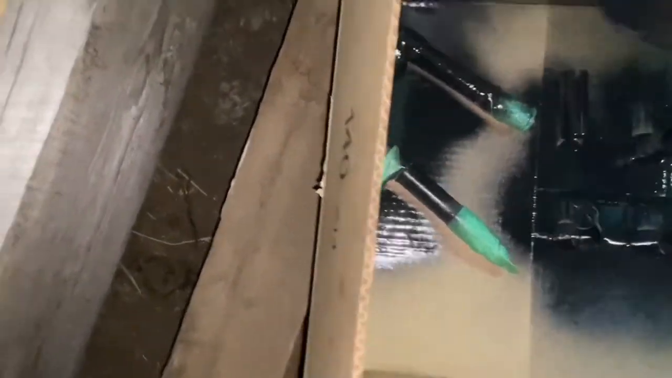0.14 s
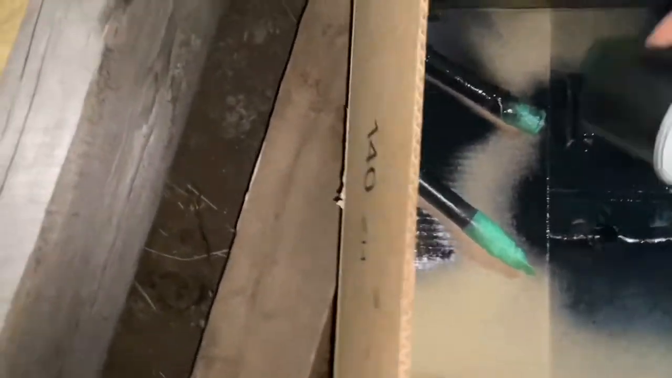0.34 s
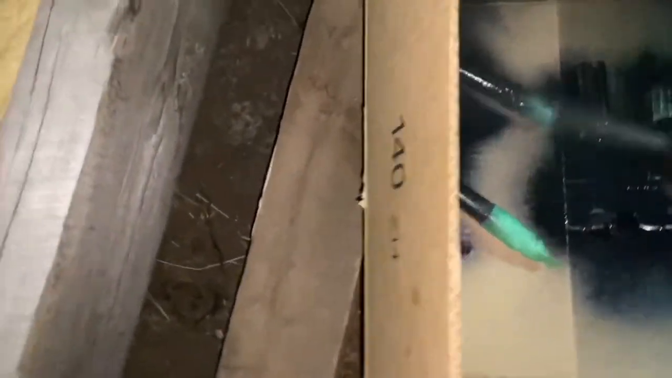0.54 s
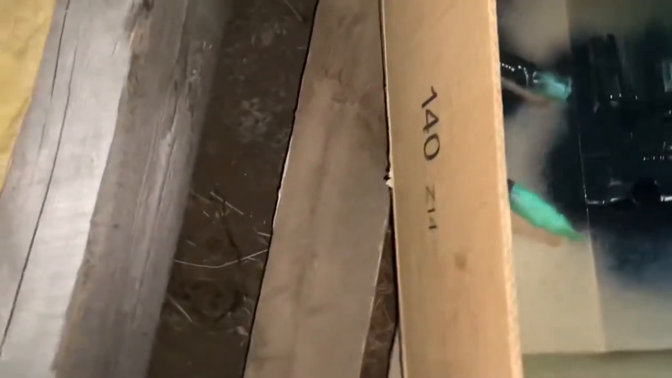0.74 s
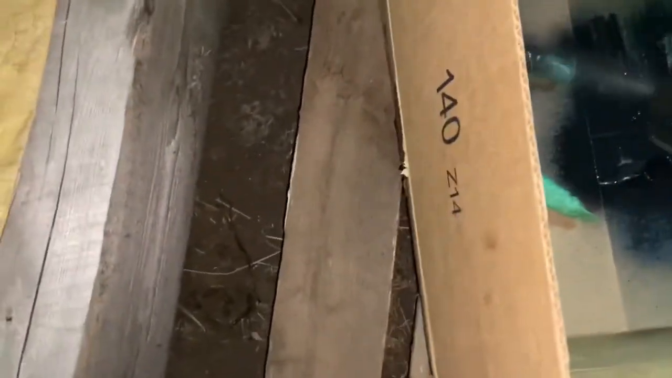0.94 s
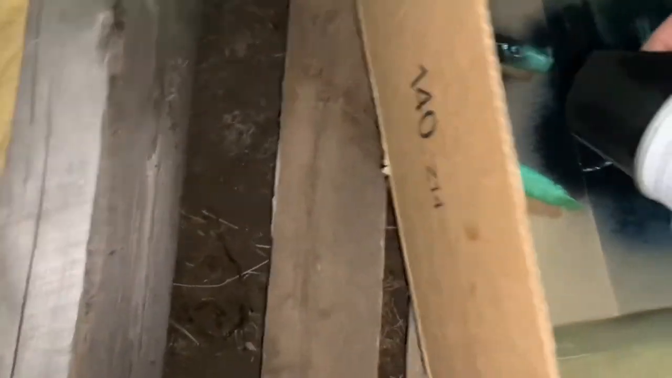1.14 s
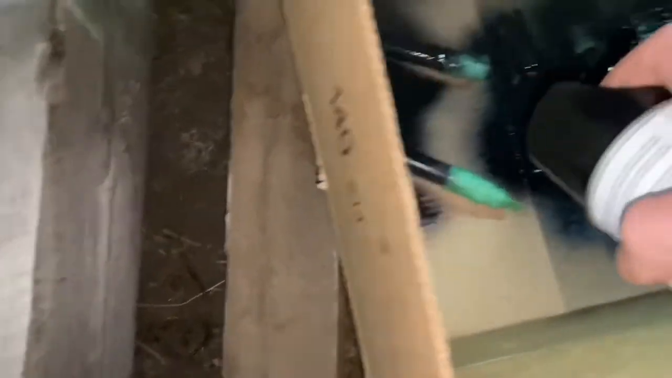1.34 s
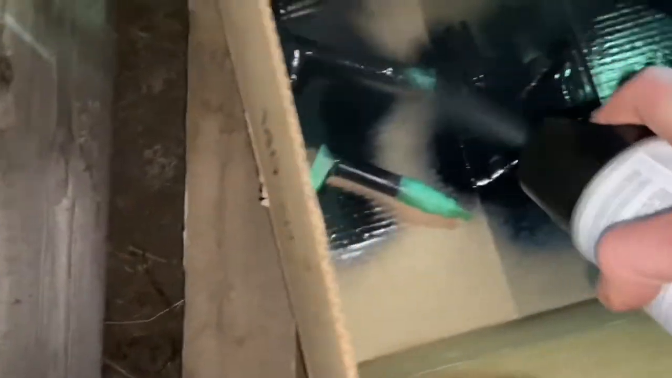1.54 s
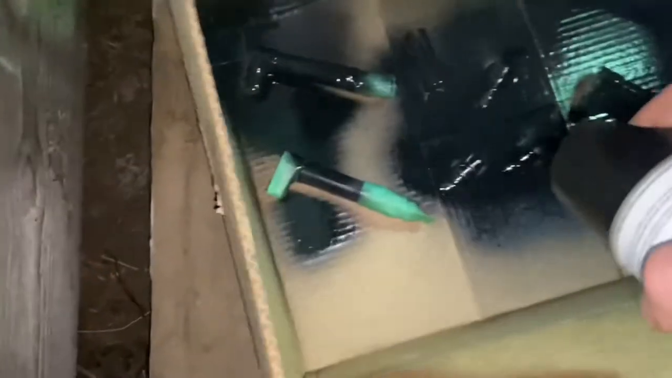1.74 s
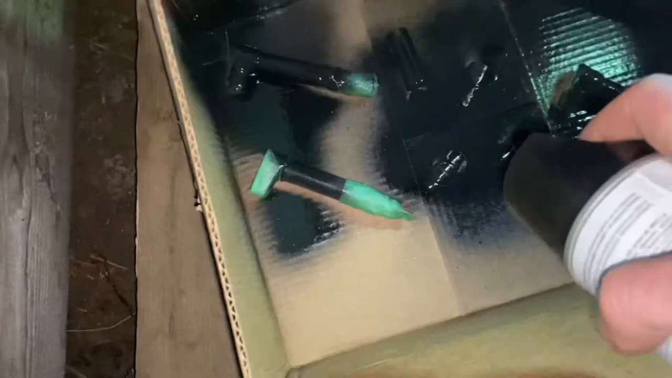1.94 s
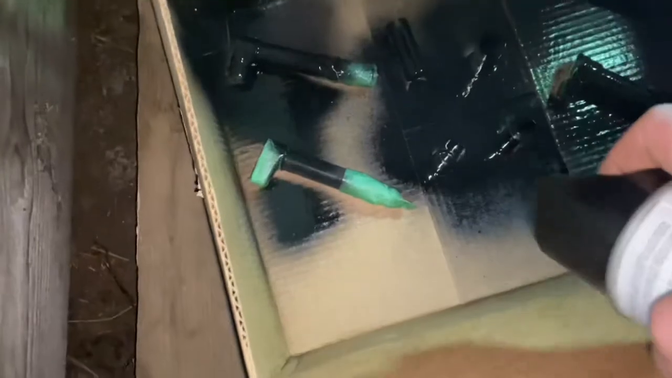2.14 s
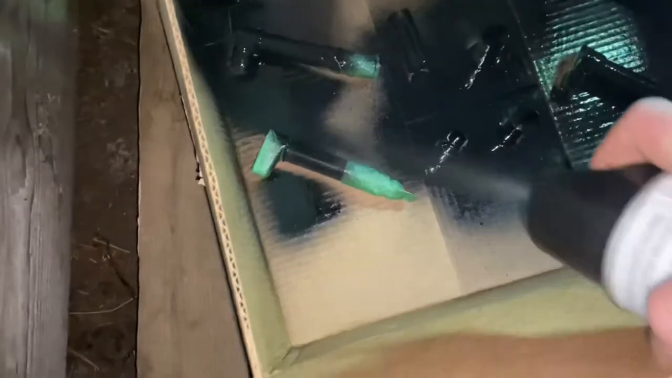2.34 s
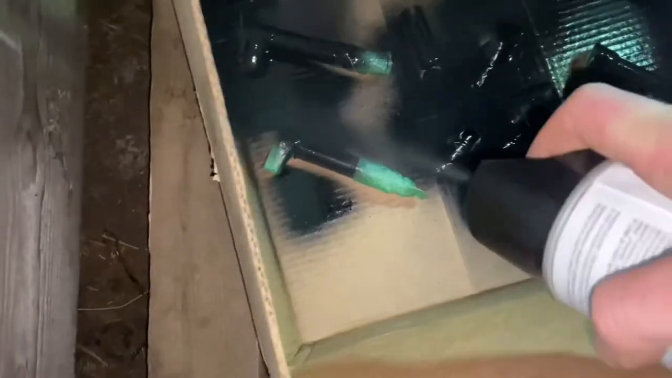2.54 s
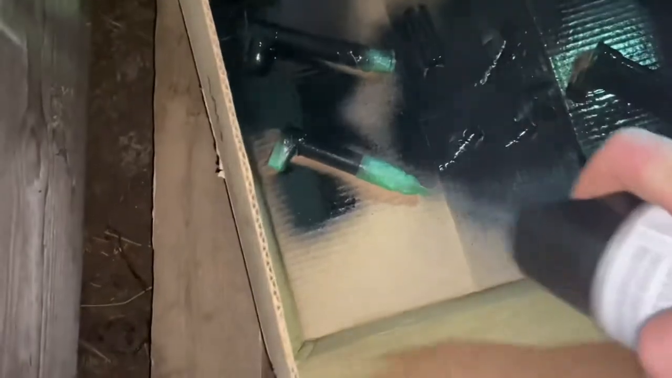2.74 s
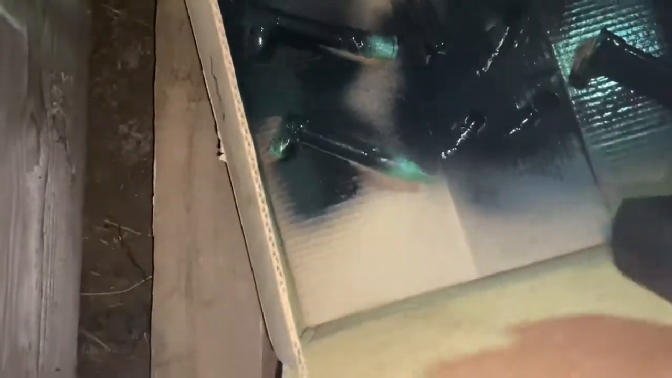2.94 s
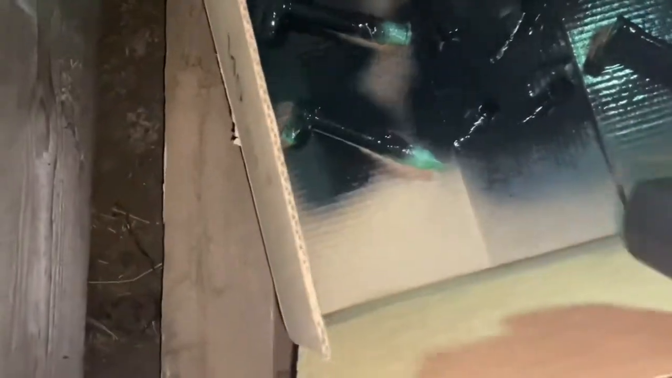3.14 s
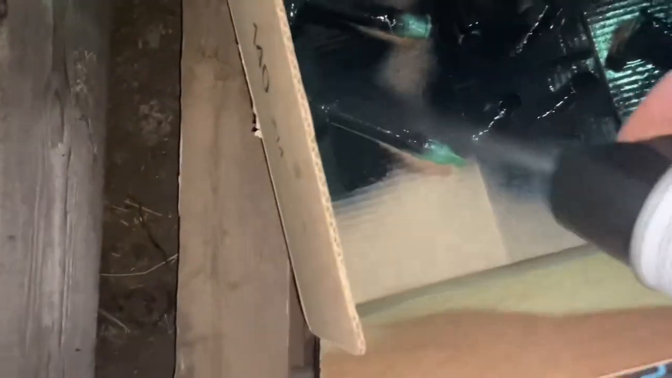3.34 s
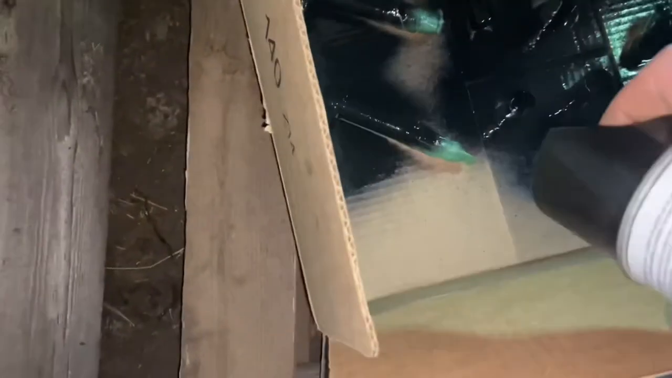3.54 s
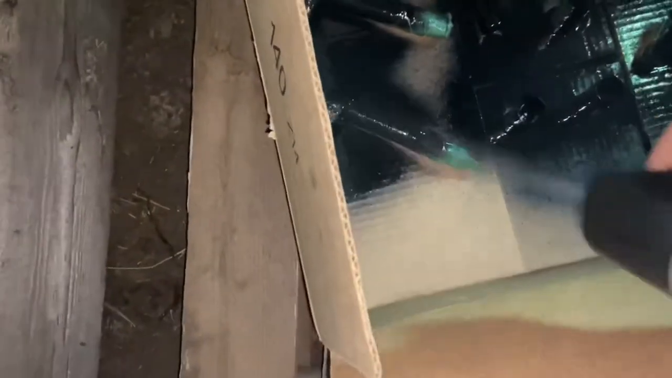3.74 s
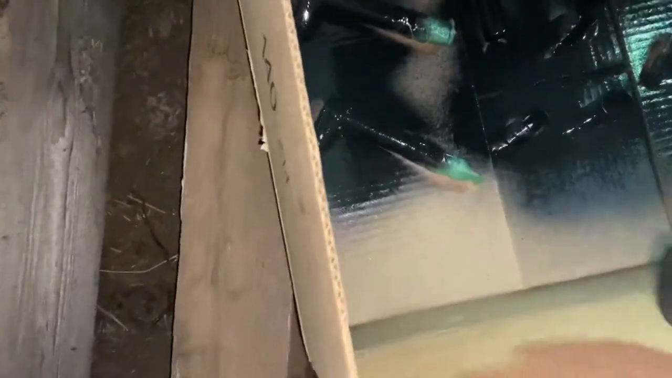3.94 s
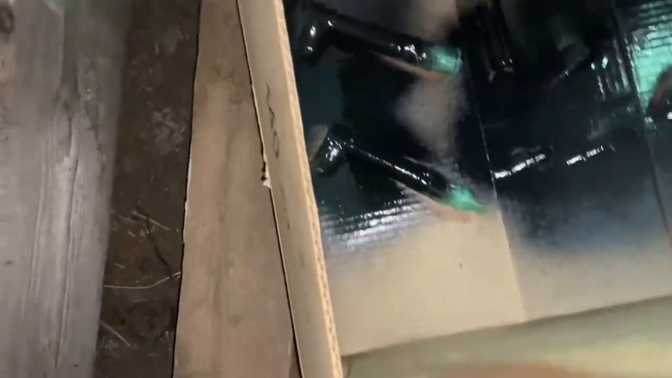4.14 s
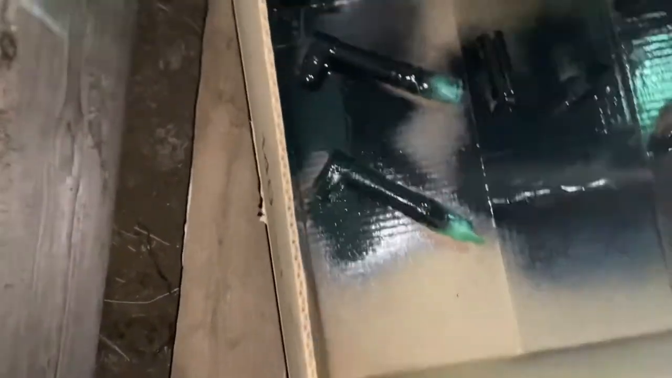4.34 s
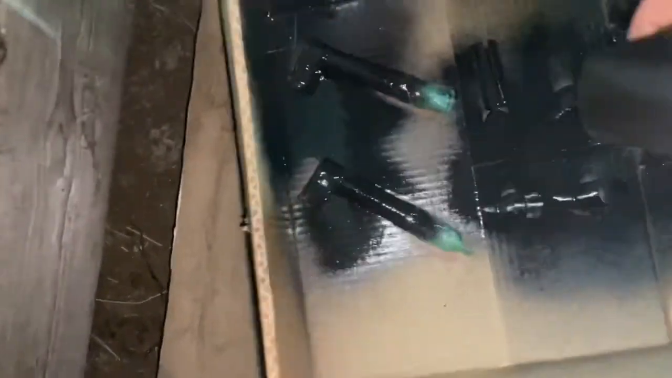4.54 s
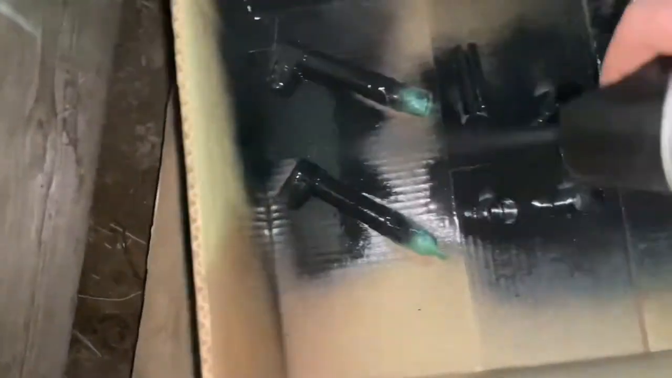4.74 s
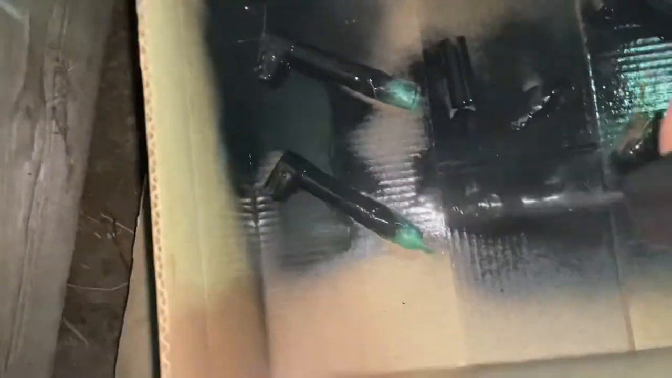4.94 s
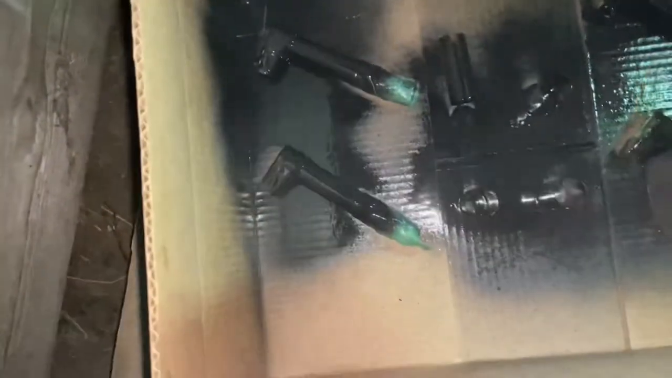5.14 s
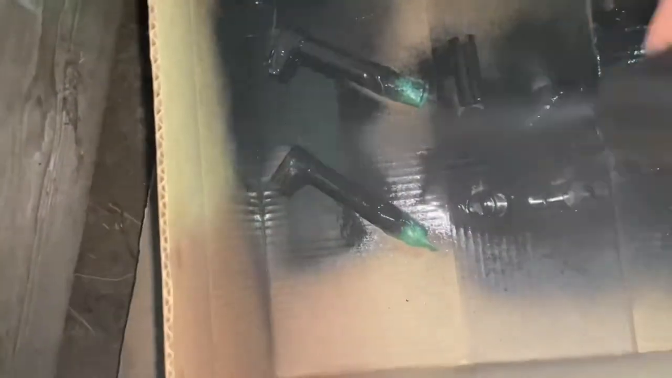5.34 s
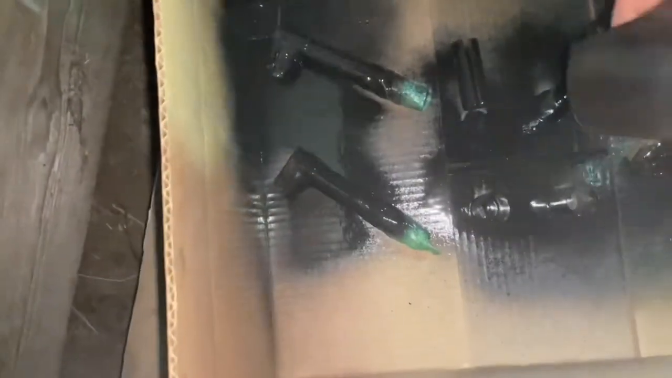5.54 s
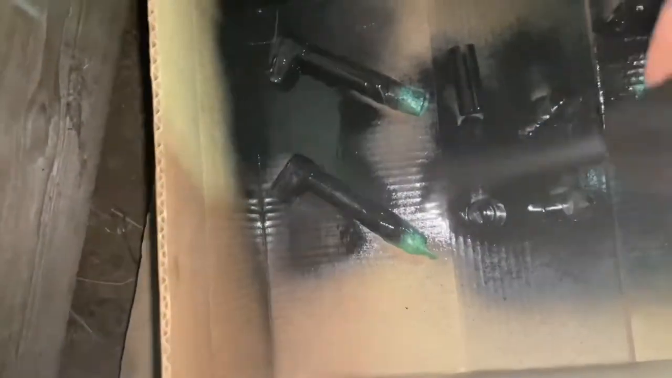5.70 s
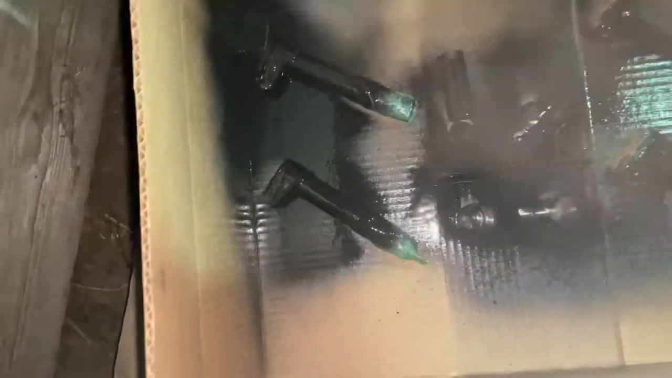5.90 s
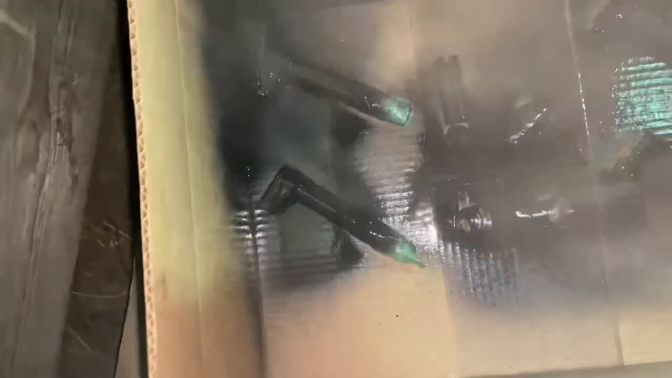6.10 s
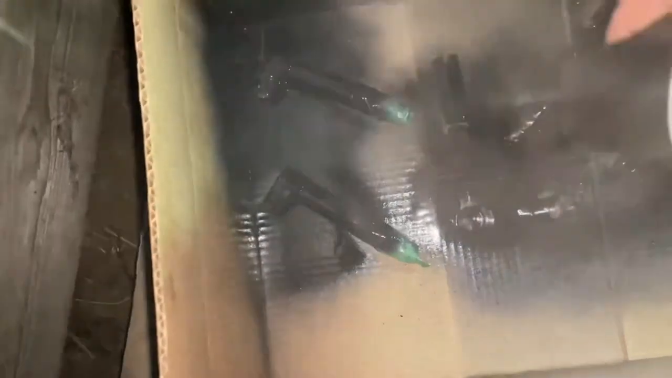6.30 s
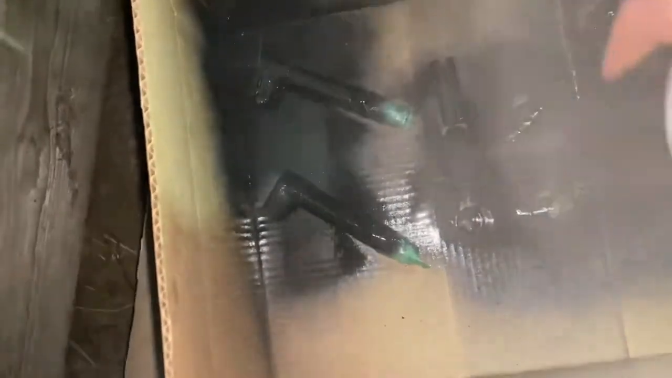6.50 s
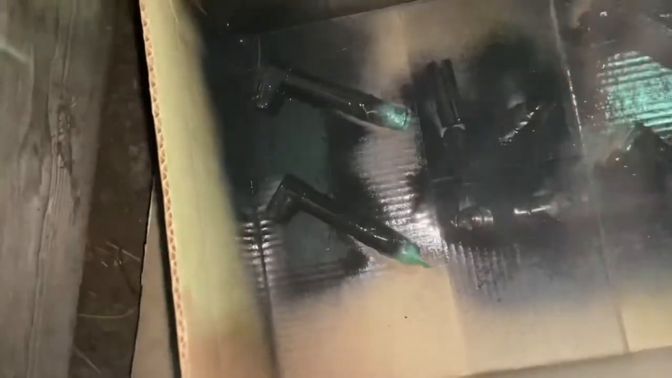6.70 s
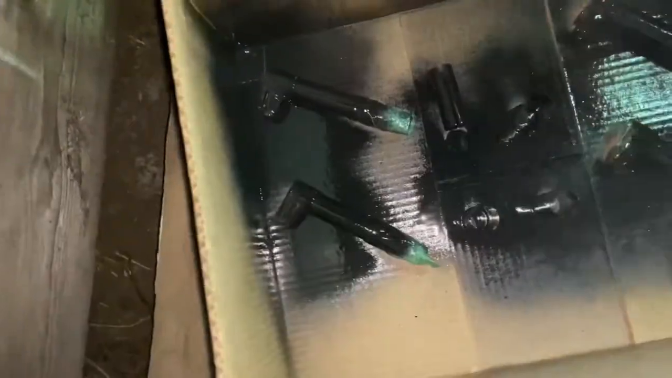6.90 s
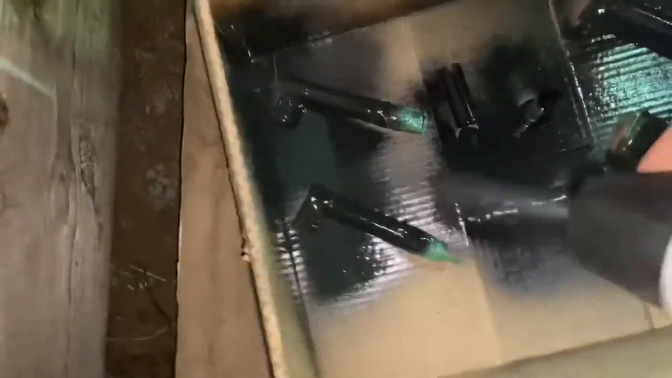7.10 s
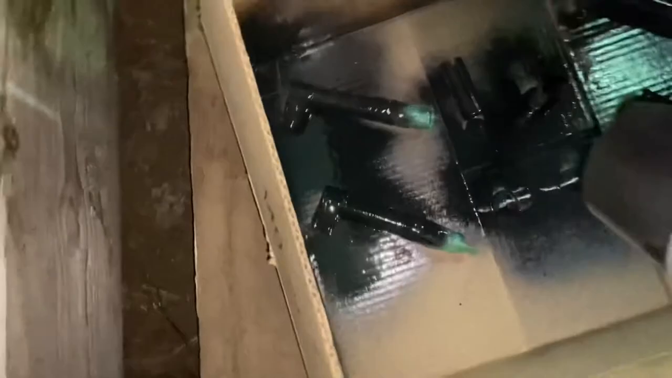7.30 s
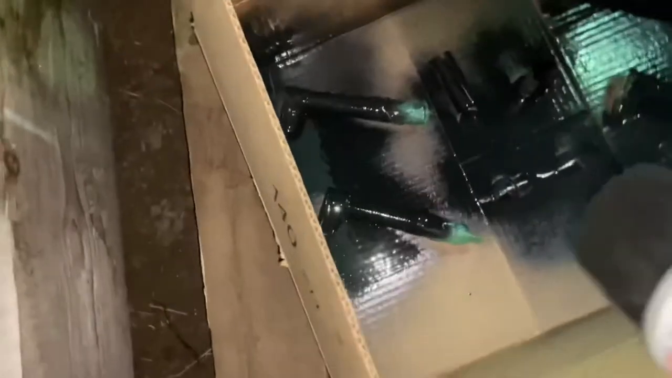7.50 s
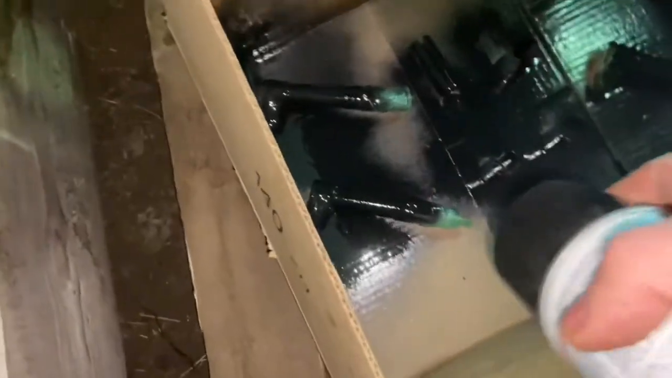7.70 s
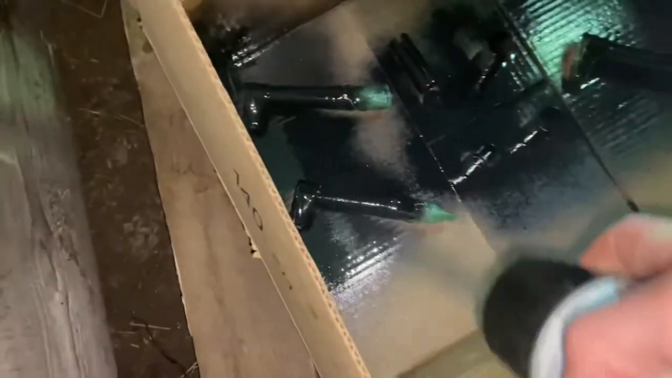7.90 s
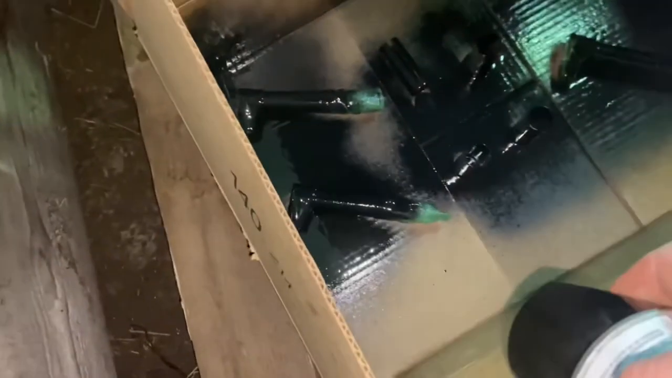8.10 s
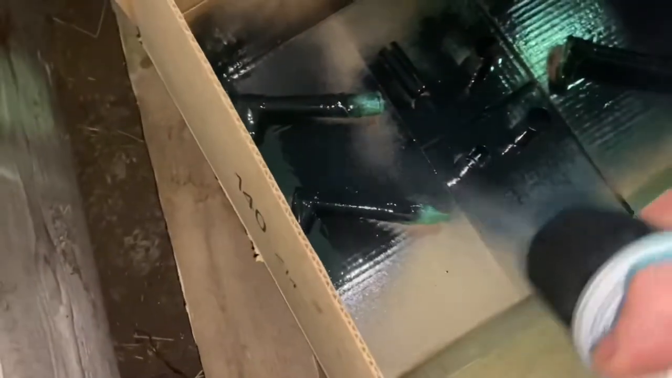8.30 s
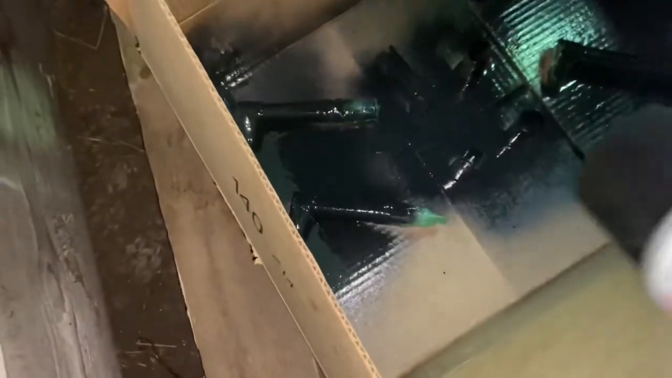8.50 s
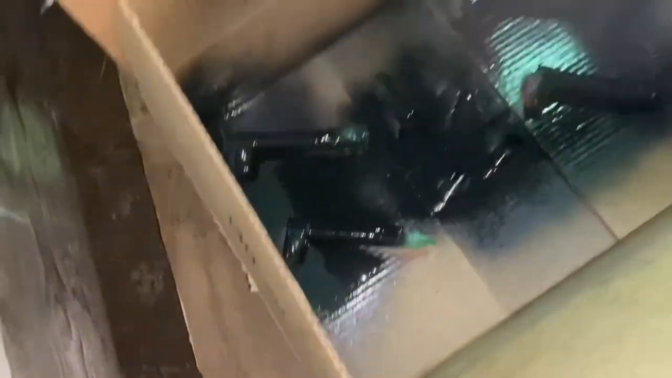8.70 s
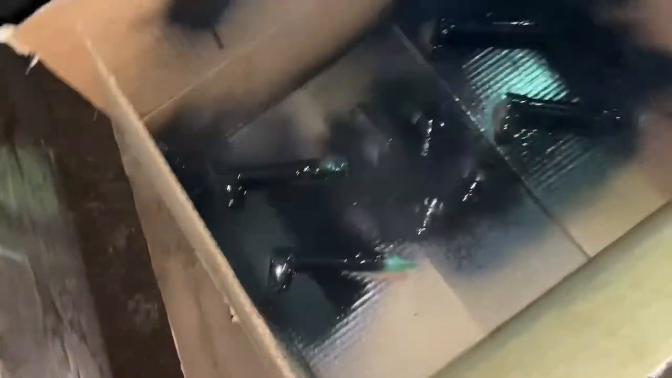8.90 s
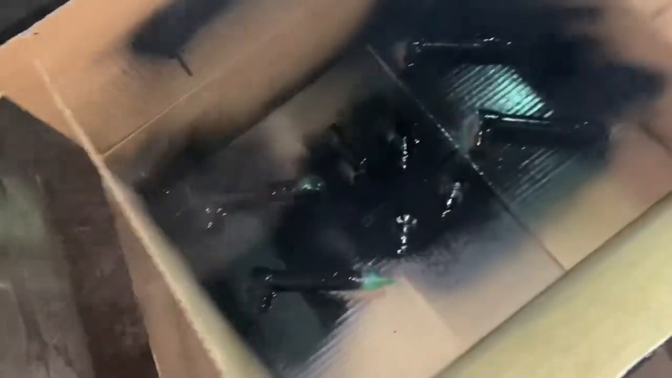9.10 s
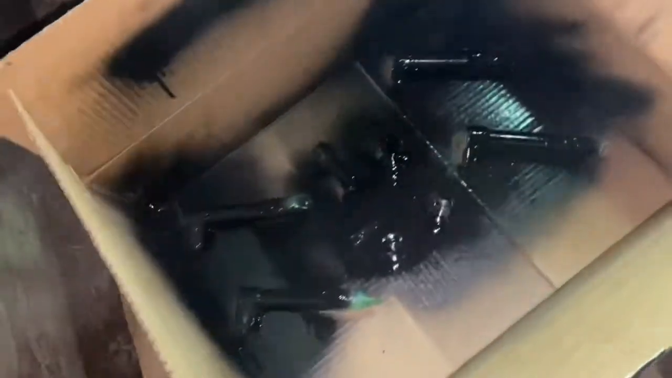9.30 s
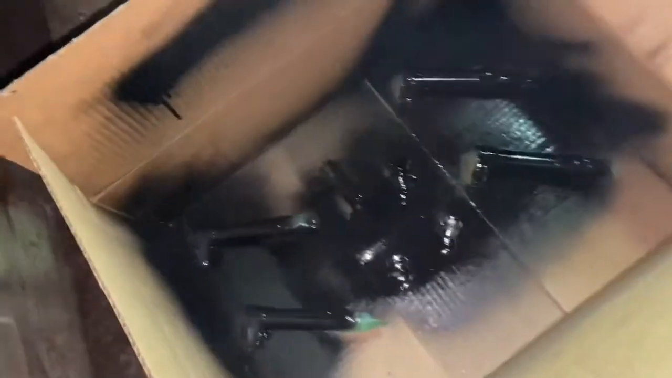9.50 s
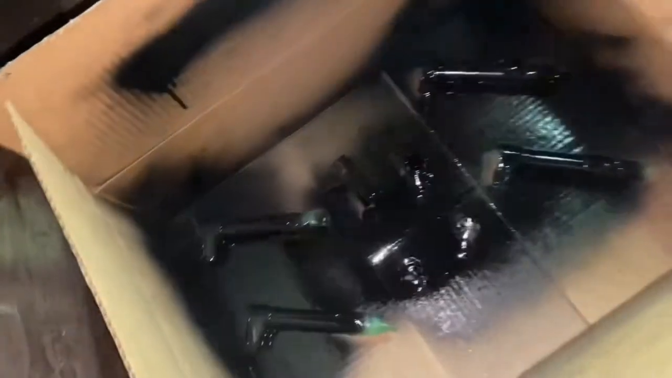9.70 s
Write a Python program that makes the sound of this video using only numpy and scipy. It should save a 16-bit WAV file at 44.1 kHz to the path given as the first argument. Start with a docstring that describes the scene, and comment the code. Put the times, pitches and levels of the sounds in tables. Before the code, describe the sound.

Quick, separate puffs of spray paint hiss into a cardboard box, followed by a scrape, a sharp knock and a rattling ball in the can.

```python
"""A spray hiss with a nozzle tone near 2.2 kHz comes in seventeen short bursts, close to the microphone.
A can paints small parts in a cardboard box: turbulent flow is shaped noise gated by a valve, the tone is
noise in narrow resonances, and delayed copies of the hiss are echoes off the box walls as the hand sweeps.
Bumps boom in the box; at the end it scrapes, a sleeve rustles and the mixing ball rattles in the can,
where short noisy contacts drive damped modes. A faint hum, hand rumble, air puffs and still air lie below."""
import sys
import numpy as np
from scipy import signal
from scipy.fft import rfft, irfft, next_fast_len
from scipy.io import wavfile
from scipy.ndimage import map_coordinates

SR = 44100
rng = np.random.default_rng(int(sys.argv[2]) if len(sys.argv) > 2 else 0)


def digitize_waveform(pressure):
    """Quantize a signal to 16-bit integers and store it at the path in sys.argv[1].

    Rows of a 2-D input are taken as channels; values are limited to [-1, 1].
    """
    field = np.atleast_2d(pressure).T
    bounded = np.clip(field, -1, 1)
    quanta = np.round(bounded * 32767).astype(np.int16)
    wavfile.write(sys.argv[1], SR, quanta)


N = 429975
TIME = np.arange(N) / SR

# Presses of the spray button. Each row: opening and shutting in seconds, nozzle tone in Hz, nominal tone
# level above the hiss in dB, nominal hiss level in dB, level in dB of the rush of air off the box, detour of
# the echo off the box floor in cm.
PRESSES = [ (-.06, 0.105, 2314, -8, -29, -59, 46), (0.35, 0.626, 2206, -7, -29, -59, 46),
           (0.834, 1.075, 2346, -6.5, -31, -58, 47), (1.372, 1.629, 2286, 0, -30, -54.5, 51),
           (2.241, 2.533, 2254, -10, -29, -49.5, 57.6), (2.69, 2.977, 2280, -6, -29.5, -48, 51),
           (3.147, 3.407, 2276, -9, -29.5, -50, 54), (3.651, 3.895, 2180, -10, -28.5, -48, 48.6),
           (4.263, 4.502, 2340, -6, -28, -49.5, 50), (4.662, 4.952, 2286, -6, -27.5, -50, 43.3),
           (5.155, 5.41, 2270, -6, -27.5, -50, 43), (5.586, 5.866, 2267, -6, -27, -55.5, 43.2),
           (6.078, 6.305, 2260, -4.5, -28, -59.5, 46.6), (6.445, 6.694, 2330, -6, -28, -56, 45),
           (6.952, 7.157, 2223, -8, -27.5, -57, 53), (7.76, 7.996, 2210, -4, -28, -48, 59.4),
           (8.195, 8.388, 2366, -6.5, -28, -46.5, 57)]
KNOCK_OCTAVES = 1.27  # width of the noise hump of ticks and churned paint


def amp(db):
    """Level law: decibels to amplitude gain."""
    return 10 ** (np.asarray(db) / 20)


def unit(x):
    """Normalization: scales to rms 1."""
    return x / np.sqrt(np.mean(x ** 2) + 1e-20)


def read(points, hz):
    """Spectral interpolation: reads (Hz, value) rows on a log-frequency axis."""
    f, value = np.transpose(points)
    return np.interp(np.log(hz + 1), np.log(f + 1), value)


def level(points):
    """Envelope: gain over time from (seconds, dB) rows."""
    return amp(np.interp(TIME, *np.transpose(points)))


def strokes(rows):
    """Envelope from (start s, length s, dB) rows: each stroke swells and fades in one smooth arch."""
    gain = np.zeros(N)
    for start, length, db in rows:
        gain += amp(db) * np.sin(np.pi * np.clip((TIME - start) / length, 0, 1)) ** 2
    return gain


def add(mix, s, sound):
    """Superposition: mixes a sound in at time s."""
    part = mix[..., round(s * SR):][..., :sound.shape[-1]]
    part += sound[..., :part.shape[-1]]


def wander(rate_hz):
    """Random modulation: low-passed noise of rms 1, varying mostly below the given rate."""
    hz = np.fft.rfftfreq(2 ** 14, 10 / 2 ** 14)  # 10 s on a coarse grid
    white = rng.standard_normal(2 * len(hz) - 2)
    slow = irfft(rfft(white) / (1 + (hz / rate_hz) ** 4))
    return unit(np.interp(TIME, np.linspace(0, 10, len(slow)), slow))


def noise(colour, size=N):
    """Partial coherence: noise of rms 1 at two ports, with gain colour(Hz) and a likeness set by frequency."""
    # Coherence of the two microphone ports. Each row: frequency in Hz, likeness from 0 to 1.
    likeness = [(100, .99), (1100, .92), (2200, .98), (2900, .65), (4400, .65), (5000, .9), (6300, .85),
                (7200, .995), (8000, .995), (8800, .6), (10400, .995), (12000, .7), (13600, .998),
                (15000, .7)]
    padded = next_fast_len(size, True)
    hz = np.fft.rfftfreq(padded, 1 / SR)
    left, other = rfft(rng.standard_normal((2, padded)))
    same = np.clip(read(likeness, hz), 0, 1)
    right = same * left + np.sqrt(1 - same ** 2) * other
    return unit(irfft(np.array([left, right]) * colour(hz), padded)[:, :size])


def shaped(spectrum):
    """Spectral shaping: noise of rms 1 with a tabled spectrum."""
    return noise(lambda hz: amp(read(spectrum, hz)))


def band(hz, centre, octaves):
    """Band shaping: gain with a soft hump on a log-frequency axis."""
    return 1 / (1 + (np.log2((hz + 1) / centre) / octaves) ** 2) ** 2.28


def resonate(x, hz, width):
    """Heterodyne resonator: shifts the curve hz down to zero, low-passes there and shifts back."""
    turn = np.exp(2j * np.pi * np.cumsum(hz) / SR)
    r = np.exp(-np.pi * width / SR)
    return 2 * (turn * signal.lfilter([1 - r], [1, -r], x / turn)).real


def grit(size):
    """Stick-slip roughness: gain of rms 1 made of random tiny catches, each dying at once."""
    per_s, catch_s, spread_db = 260, .003, 4
    catches = (rng.random(size) < per_s / SR) * amp(spread_db * rng.standard_normal(size))
    return unit(signal.lfilter([1], [1, -np.exp(-1 / (catch_s * SR))], catches))


def still_air(still_db=-73):
    """Stationary noise: a steady shaped floor of still air."""
    # Spectrum of still air. Each row: frequency in Hz, density in relative dB per Hz.
    air = [(20, -12.5), (70, -30), (400, -2), (6000, -24), (15000, -51.5)]
    return amp(still_db) * shaped(air)


def hand_rumble():
    """Amplitude-modulated low noise: the moving hand rumbles."""
    # Spectrum of handling. Each row: frequency in Hz, density in relative dB per Hz.
    handling = [(20, -17), (45, -1.5), (68, 12), (100, 1.5), (300, -4.5), (1500, -34)]
    # Rumble of the moving hand. Each row: time in seconds, level in dB.
    rumble = [(1.3, -72.5), (2.2, -58), (3.5, -64), (4.1, -60.5), (5.9, -72), (7.6, -71.5), (8.5, -58.5),
              (9.5, -57)]
    return shaped(handling) * level(rumble)


def hum(base_hz=115.8, waver=0.029):
    """Harmonic series on a wavering base: a faint far hum swells and fades."""
    # Swells of the hum. Each row: start in seconds, length in seconds, level in dB.
    swells = [(1.1, 2.3, -60.5)]
    # Harmonics of the hum. Each row: multiple of the base frequency, relative level in dB.
    harmonics = [(1, 2.5), (2, -3.5)]
    turns = np.cumsum(base_hz * (1 + waver * wander(9.0))) / SR
    tone = sum(amp(db) * np.sin(2 * np.pi * k * turns) for k, db in harmonics)
    return strokes(swells) * unit(tone)


def puffs(centre_hz=45, octaves=0.89):
    """Low-frequency turbulence: air thrown back by the box buffets the microphone."""
    # Puffs of air. Each row: start in seconds, length in seconds, level in dB.
    gusts = [(2.66, 0.26, -51), (7.76, 0.45, -47.5)]
    return noise(lambda f: band(f, centre_hz, octaves)) * strokes(gusts)


def sleeve(smooth=1.5):
    """Friction noise: cloth rustles in gritty strokes as the arm moves."""
    # Spectrum of cloth. Each row: frequency in Hz, density in relative dB per Hz.
    cloth = [(60, -20), (700, -0.5), (2000, -4.5), (5000, -4), (8000, -10), (15500, -15.5)]
    # Strokes of the sleeve. Each row: start in seconds, length in seconds, level in dB.
    rubs = [(-.35, 1.26, -53), (.775, 0.054, -47), (3.03, 0.092, -49.5), (3.75, 1.18, -59.5),
            (6.3, 1.6, -59), (8.2, 1.9, -55), (8.81, 0.29, -48), (9.15, 0.052, -49)]
    return shaped(cloth) * strokes(rubs) * unit(smooth + grit(N))


def workshop(x):
    """Diffuse reverberation: convolves with a short noise tail, each band decaying at its own rate."""
    # Decay of the room. Each row: frequency in Hz, time to fall 60 dB in seconds.
    decay = [(1000, 0.3), (4000, 0.25)]
    hz, t, z = signal.stft(noise(np.ones_like, size=SR // 2), SR, nperseg=256)
    tail = signal.istft(z * amp(-60 * t / read(decay, hz)[:, None]), SR, nperseg=256)[1]
    tail *= np.clip(np.arange(tail.shape[1]) / SR / 0.0075, 0, 1)  # 7.5 ms build-up
    mono = x.mean(0)[None]
    return signal.fftconvolve(mono, tail / np.linalg.norm(tail[0]), axes=1)[:, :N]


def scrape(slip_db=4.0, smooth=1.0):
    """Friction-driven resonance: uneven slips, gritty with small catches, ring the cardboard panels."""
    # Scrapes of the box. Each row: start in seconds, length in seconds, level in dB.
    drags = [(8.8, 0.3, -45.5)]
    # Resonances of the panels. Each row: frequency in Hz, width in Hz, relative level in dB.
    panels = [(262, 34, 12), (650, 280, -2), (1960, 290, -2)]

    def colour(f):
        return sum(amp(db) / (1 + (2 * (f - hz) / width) ** 2) for hz, width, db in panels)

    slips = amp(slip_db * wander(30))
    return noise(colour) * strokes(drags) * slips * unit(smooth + grit(N))


def bumps():
    """Modal decay: each bump sets the cardboard panels booming."""
    # Bumps on the box. Each row: time in seconds, level in dB.
    hits = [(3.059, -53), (7.932, -31), (8.022, -31), (8.042, -40.5)]
    # Modes of the box. Each row: frequency in Hz, relative level in dB, time to fall 60 dB in seconds.
    box_modes = [(45.3, -16, 0.52), (208, -9.5, 0.36), (253.5, 13, 0.068), (308, 1, 0.14)]
    out, t = np.zeros((2, N)), np.arange(SR // 2) / SR
    boom = sum(amp(db - 60 * t / t60) * np.sin(2 * np.pi * hz * t) for hz, db, t60 in box_modes)
    boom *= 1 - np.exp(-t / 0.0038)  # soft onset
    for s, db in hits:
        add(out, s, amp(db) * boom)
    return out


def ticks():
    """Overdamped impact: dead clicks and scuffs of the finger, the plastic cap and the cardboard."""
    # Ticks. Each row: time in seconds, level in dB, centre in Hz, decay time constant in seconds.
    clicks = [(.168, -43.5, 1290, .006), (1.124, -44.5, 1800, .013), (1.839, -46.5, 1574, 0.0057),
              (5.054, -50, 1030, 0.0094), (7.253, -46, 1740, 0.0081), (7.284, -45, 2090, .007),
              (7.543, -50.5, 1470, 0.0097), (8.023, -45.5, 1410, 0.012), (8.039, -44.5, 6400, 0.0055),
              (8.675, -41.5, 5400, 0.0021), (8.877, -30.5, 3440, 0.0096), (8.925, -36.5, 1900, 0.0091),
              (8.959, -33, 704, .005), (9.004, -42.5, 1980, 0.011)]
    out, t = np.zeros((2, N)), np.arange(SR // 10) / SR
    for s, db, centre, decay_s in clicks:
        # a longer contact also starts more softly
        envelope = np.exp(-t / decay_s) * (1 - np.exp(-t / (0.12 * decay_s)))
        click = noise(lambda f: band(f, centre, KNOCK_OCTAVES), size=len(t))
        add(out, s, amp(db) * click * envelope / envelope.max())
    return out


def ball(clack_db=-5.0, ring_db=-37, churn_db=-20, churn_s=0.029, rise_per_s=0.057):
    """Modal excitation: the ball skids on the can wall, drives its damped modes and churns the paint."""
    # Blows on the can wall. Each row: time in seconds, level in dB of the knock's first 7 ms.
    blows = [(9.2509, -19.5), (9.356, -40.5), (9.391, -24), (9.411, -40.5), (9.4705, -28), (9.513, -43),
             (9.522, -40), (9.536, -30.5), (9.579, -45.5), (9.598, -29), (9.644, -37.5), (9.677, -38.5),
             (9.71, -38.5), (9.735, -41)]
    # Modes of the steel can. Each row: frequency in Hz, relative level in dB, time to fall 60 dB in seconds.
    can_modes = [(1970, -0.5, 0.016), (2350, 4.5, 0.012), (2900, 3.5, 0.0067), (4295, 3, 0.027),
                 (4370, -16.5, 0.024), (5740, -17, 0.011), (7180, 1, 0.01), (8030, -8, 0.025),
                 (9830, -12.5, 0.017)]
    out, t = np.zeros((2, N)), np.arange(SR // 5) / SR
    hz, mode_db, t60 = np.transpose(can_modes)[:, :, None]
    lowest_hz = hz.min()
    ring_t60, spread, spot_db = .18, .01, 3
    fade = amp(-60 * t / t60) + amp(ring_db - 60 * t / ring_t60)  # a faint ring outlasts each mode
    # a firm blow is bright and short; each dB below cushion_db, the paint makes it duller and longer
    cushion_db, contact_s, longer_s = -33, 0.0076, 0.00045
    firm_db_per_octave, dulling_db_per_octave = 8, 1.17

    for s, db in blows:
        soft_db = max(cushion_db - db, 0)
        tilt_db = firm_db_per_octave - dulling_db_per_octave * soft_db
        contact = contact_s + longer_s * soft_db

        def colour(f):
            tilt = amp(tilt_db * np.log2(np.maximum(f / lowest_hz, 1)))
            hump = band(f, 5050, 3.25) * tilt * np.minimum(f / lowest_hz, 1)
            return hump / (1 + (f / 14000) ** 8)

        detune, spot = rng.standard_normal((2, *hz.shape))  # each blow lands on another spot
        # the ring rises as the can tips
        ring_hz = hz * (1 + rise_per_s * (s - blows[0][0]) + spread * detune)
        wall = (amp(mode_db + spot_db * spot) * fade * np.sin(2 * np.pi * ring_hz * t)).sum(0)
        skid = noise(colour, size=len(t)) * np.exp(-(t / contact) ** 4) * np.minimum(t / 0.00072, 1)
        ring = signal.fftconvolve(skid, wall[None], axes=1)[:, :len(t)]
        blow = unit(ring) + amp(clack_db) * unit(skid)
        blow /= blow[:, :SR // 150].std()
        churn = noise(lambda f: band(f, 2490, KNOCK_OCTAVES), size=len(t))
        churn = churn * grit(len(t)) * np.exp(-t / churn_s)
        add(out, s, amp(db) * (blow + amp(churn_db + soft_db) * churn))
    return out


def valve(leak_db=-16, leak_s=0.029, pop_db=-7, eased_db=-10, shut_s=0.0099, dribble_db=-28):
    """Flow control: the valve leaks, pops open, eases off under the finger, shuts, and the nozzle empties."""
    open_s, ease_s, pop_s, dribble_s = 0.028, 0.02, .002, .028
    flow = np.zeros(N)  # share of full flow
    gains = [0, amp(leak_db), amp(pop_db), 1, 1, amp(eased_db), amp(dribble_db)]
    for opens, shuts, *_ in PRESSES:
        times = [opens - leak_s, opens, opens + pop_s, opens + open_s,
                 shuts - ease_s - shut_s, shuts - shut_s, shuts]
        dribble = np.exp(-np.clip(TIME - shuts, 0, 1) / dribble_s)
        flow += np.interp(TIME, np.maximum.accumulate(times), gains) * dribble
    return flow


def box_walls(x, floor_cm, floor_echo=0.48, wall_echo=0.58):
    """Comb filtering: a floor echo, and treble wall echoes whose paths change as the hand sweeps."""
    sound_cm_per_s, wall_delays_s, sweep = 34300, (.0023, .0034, .0052), .16

    def late(sound, s):
        return np.array([map_coordinates(channel, [(TIME - s) * SR], order=2) for channel in sound])

    treble = signal.sosfilt(signal.butter(1, 1500, "high", fs=SR, output="sos"), x)
    walls = sum(late(treble, s * (1 + sweep * wander(0.82))) for s in wall_delays_s)
    floor = late(x, floor_cm / sound_cm_per_s)
    total = np.sqrt(1 + floor_echo ** 2 + len(wall_delays_s) * wall_echo ** 2)
    return (x + floor_echo * floor + wall_echo * walls) / total


def nozzle(tone_hz, progress, skirt_hz=450, drift=0.011, build_db=4.5,
           low_hz=1990, low_width_hz=260, low_db=-11):
    """Noise-driven resonance: a narrow tone that builds and flares, and a broad, steady hump below it."""
    # Times in seconds at which paint spits and the tone flares.
    flare_times = [.965, 1.467, 4.874, 5.781, 6.606, 7.07]
    flare_db, flare_s = 8, 0.016
    tone_hz = tone_hz * (1 + drift * wander(10))
    core = resonate(noise(np.ones_like), tone_hz, 110)
    flare = sum(np.maximum(1 - abs(TIME - s) / flare_s, 0) for s in flare_times)
    build = build_db * (np.sin(np.pi * progress ** 1.6) - 0.5)
    tone = unit(resonate(core, tone_hz, skirt_hz)) * amp(build + flare_db * flare)
    low = noise(lambda f: 1 / (1 + ((f - low_hz) / (low_width_hz / 2)) ** 2))
    return tone, amp(low_db) * low


def spray(sputter_db=1.0, sway_db=0.84, swell_db=-3.5, hollow_hz=3050, hollow_width_hz=470,
          hollow_drift=0.04, edge_hz=2490, edge_width_hz=70):
    """Turbulent jet: hiss, tone and rush of air follow the valve; droplets make hiss and tone sputter."""
    # Spectrum of the hiss. Each row: frequency in Hz, density in relative dB per Hz.
    jet_spectrum = [(150, -40.5), (380, -7), (560, 1), (1100, -2.5), (1450, 1.5), (2400, 0.5), (2900, 2.5),
                    (3900, -8), (5500, 4.5), (6800, -7.5), (8800, -7.5), (10200, -4), (15700, -3)]
    # Spectrum of the rush of air off the box. Each row: frequency in Hz, density in relative dB per Hz.
    rush_spectrum = [(20, -4.5), (45, -17.5), (90, -4), (280, 0.5), (550, -7), (1700, -9.5), (2700, -48)]
    starts, ends = np.transpose(PRESSES)[:2]
    press = np.searchsorted((ends[:-1] + starts[1:]) / 2, TIME)  # settings change midway between presses
    opens, shuts, tone_hz, tone_db, hiss_db, rush_db, floor_cm = np.array(PRESSES)[press].T
    progress = np.clip((TIME - opens) / (shuts - opens), 0, 1)
    flow, sweep = valve(), hollow_drift * wander(1.3)

    hiss = shaped(jet_spectrum)
    bass = signal.sosfilt(signal.butter(1, 1500, fs=SR, output="sos"), hiss)
    hiss -= bass * (1 - flow)  # a weak jet is thin
    tone, low = nozzle(tone_hz, progress)
    jet = box_walls(hiss, floor_cm) + amp(tone_db) * tone + low

    # a narrow antiresonance cuts the tone's upper edge
    jet = jet - resonate(jet, edge_hz * (1 + sweep / 2), edge_width_hz)
    for _ in range(2):  # a steep, wide one hollows the hiss above it
        jet = jet - resonate(jet, hollow_hz * (1 + sweep), hollow_width_hz)

    rush = shaped(rush_spectrum) * amp(rush_db) * flow ** 2
    # the finger eases a little through each press
    push_db = sputter_db * wander(160) + sway_db * wander(4.4) + swell_db * (progress - .5)
    return jet * flow * amp(hiss_db + push_db) + rush


def scene(spray_room_db=-23, knock_room_db=-13):
    """Superposition: spray and knocks with their reverberation, over cloth, rumble, hum, puffs and air."""
    floor = still_air() + hand_rumble() + hum() + puffs()
    knocks = scrape() + bumps() + ticks() + ball()
    jet = spray()
    room = workshop(amp(spray_room_db) * jet + amp(knock_room_db) * knocks)
    return floor + sleeve() + knocks + jet + room


def record(dry):
    """Interaural-style cues: the two microphone ports differ in level and phase; then a band limit."""
    # Phase between the ports. Each row: frequency in Hz, lead of the left in radians.
    lead = [(2000, 0), (2400, .8), (3600, .3), (4200, 1), (4900, 0), (6000, 1.5), (7000, 3), (8000, 3.3),
            (9700, 6.2), (11400, 6.5), (12600, 9.1), (14200, 9.5), (15800, 12.4)]
    # Level between the ports. Each row: frequency in Hz, left minus right in dB.
    balance = [(60, 0), (250, -4), (700, -4.5), (1400, -1), (2300, -2.5), (3200, 0)]
    edge_hz = 15800
    hz = np.fft.rfftfreq(N, 1 / SR)
    side = np.array([[.5], [-.5]])  # half of each difference goes to each port
    ports = amp(side * read(balance, hz)) * np.exp(1j * side * read(lead, hz))
    heard = irfft(rfft(dry) * ports, N)
    lowpass = signal.firwin(511, edge_hz, window=("kaiser", 9), fs=SR)
    return signal.oaconvolve(heard, lowpass[None], "same")


dry = scene()
out = record(dry)
digitize_waveform(out)
```